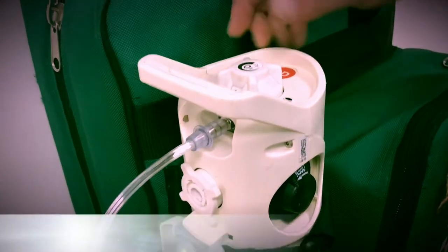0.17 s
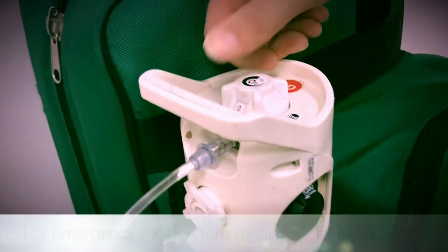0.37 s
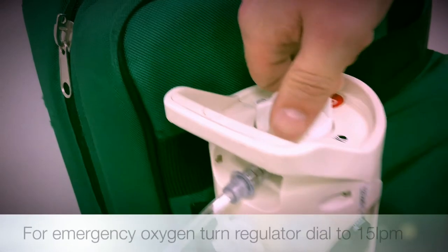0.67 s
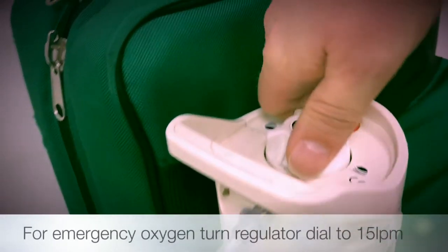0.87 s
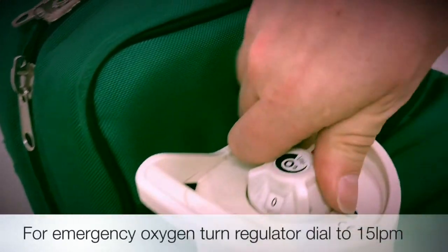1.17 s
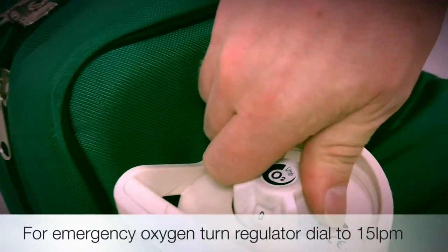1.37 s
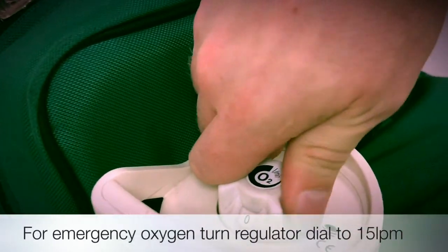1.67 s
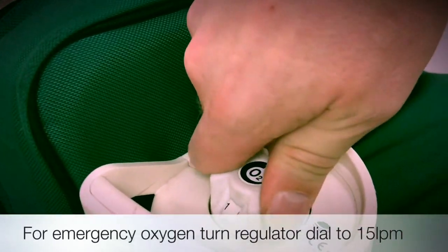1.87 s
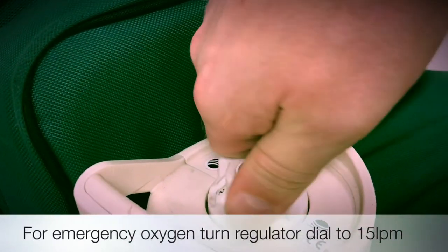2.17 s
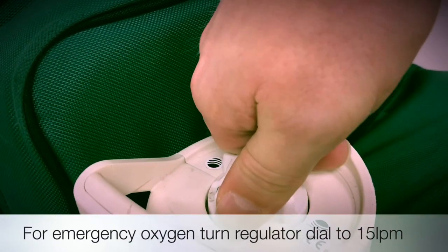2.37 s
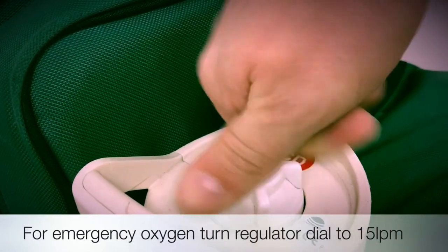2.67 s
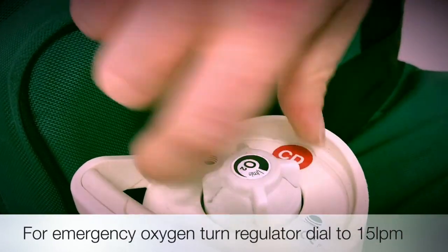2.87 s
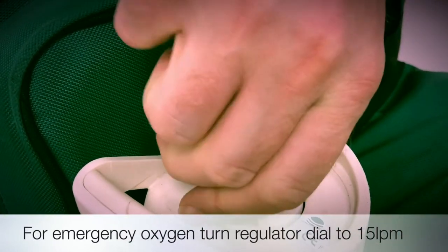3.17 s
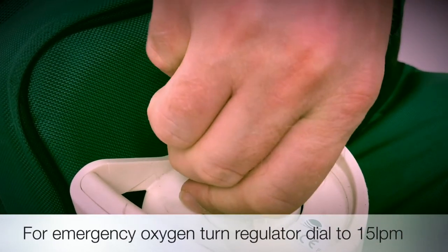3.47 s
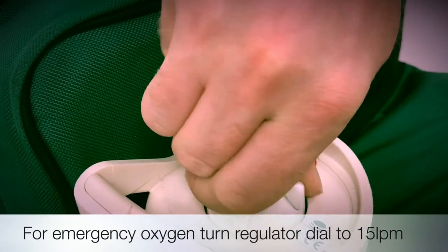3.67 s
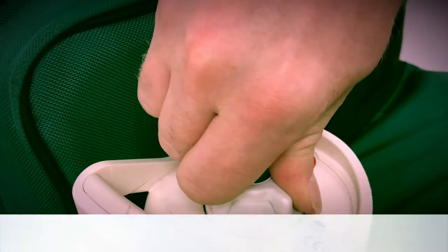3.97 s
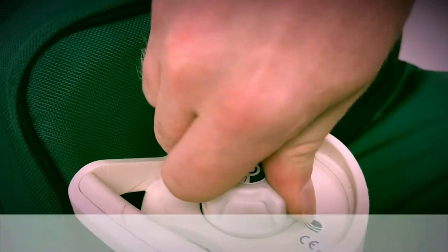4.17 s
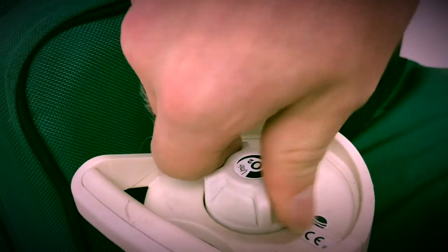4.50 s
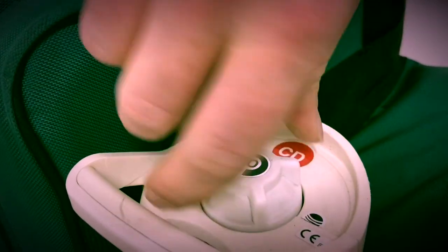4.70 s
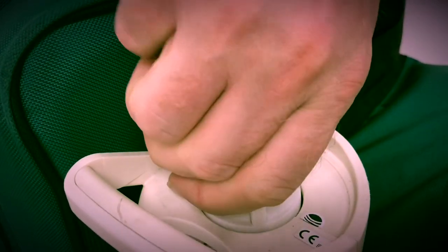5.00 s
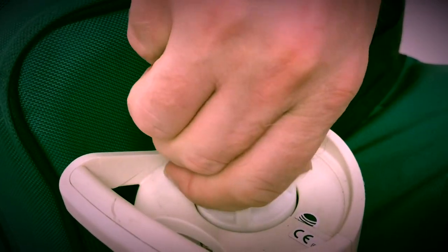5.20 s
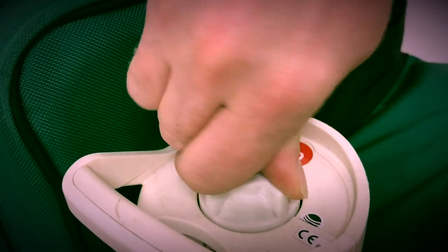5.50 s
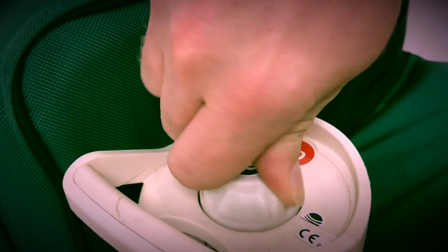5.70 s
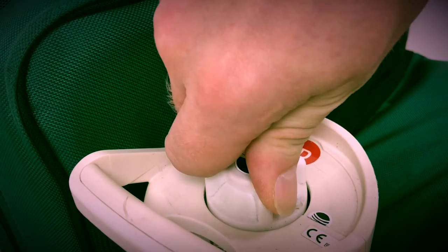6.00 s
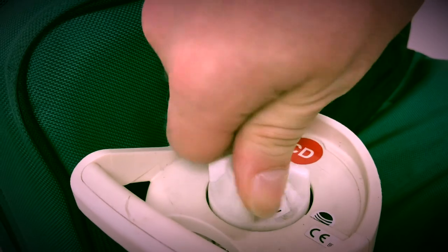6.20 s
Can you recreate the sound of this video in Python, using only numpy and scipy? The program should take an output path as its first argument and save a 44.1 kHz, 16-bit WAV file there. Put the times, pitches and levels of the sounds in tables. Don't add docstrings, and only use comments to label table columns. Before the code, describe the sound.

A hand turns a plastic gas-cylinder dial with sharp, rattling detent clicks over low ventilation rumble, while a hiss of gas grows stronger.

```python
import sys
import numpy as np
from scipy import signal
from scipy.fft import rfft, irfft, next_fast_len
from scipy.io import wavfile
from scipy.ndimage import uniform_filter1d

SR = 44100
rng = np.random.default_rng(int(sys.argv[2]) if len(sys.argv) > 2 else 0)


def makeup_ratio(level_db):
    decades = np.asarray(level_db, float) / 20
    return 10 ** decades


def waveform_to_disk(signal):
    frames = np.transpose(np.atleast_2d(signal))
    scaled = np.clip(frames, -1, 1) * 32767
    samples = np.round(scaled).astype(np.int16)
    wavfile.write(sys.argv[1], SR, samples)


N = 279946
T = np.arange(N) / SR
M = next_fast_len(N)
F = np.fft.rfftfreq(M, 1 / SR)


def level(x, db):
    return x * makeup_ratio(db) / np.sqrt(np.mean(x ** 2))


def add(out, s, x):
    i = int(s * SR)
    out[i:i + len(x)] += x[:N - i]


def colour(x, gain):
    return irfft(rfft(x, M) * gain, M)[..., :N]


def noise(gain):
    return level(colour(rng.standard_normal(N), gain), 0)


def shape(points):
    hz, db = np.transpose(points)
    return makeup_ratio(np.interp(np.log(F + 1), np.log(hz), db))


def peak(hz, width):
    return 1 / (1 + 1j * (F - hz) / (width / 2))


def band(x, lo_hz, hi_hz):
    edges_hz = [lo_hz, min(hi_hz, .45 * SR)]
    return signal.sosfilt(signal.butter(4, edges_hz, "band", fs=SR, output="sos"), x)


def walk(rate):
    k = int(SR / rate)
    once = uniform_filter1d(rng.standard_normal(N), k)
    return level(uniform_filter1d(once, k), 0)


def ring(impacts, hz, t60):
    r = makeup_ratio(-60 / (t60 * SR))
    poles = [1, -2 * r * np.cos(2 * np.pi * hz / SR), r * r]
    return level(signal.lfilter([1, 0, -1], poles, impacts), 0)


def flatten(x):
    spectrum = rfft(x)
    return irfft(spectrum / uniform_filter1d(np.abs(spectrum), size=80), len(x))


# (f/Hz, level/dB per Hz)
ROOM_AIR = [(20, -62), (42, -21), (58, -2), (70, -4), (88, 1), (105, -2.5), (130, -10), (190, -17),
            (215, -15.5), (300, -17), (380, -27), (600, -29.5), (1400, -34.5), (1800, -38),
            (1800, -38.5), (2550, -38.5), (3300, -43.5), (5000, -50), (8000, -55.5), (16000, -60)]
# (t/s, rumble level/dB)
RUMBLE_DRIFT = [(0, -44), (.6, -43), (1.0, -42.5), (1.6, -43), (2.1, -40.5), (2.6, -41), (3.05, -42.5),
                (3.3, -39), (3.65, -43), (4.2, -41), (4.7, -42), (5.2, -43), (5.75, -41), (6.0, -42),
                (6.35, -39.5)]


def room():
    air_db, hum_hz, hum_db = -41.5, 98.3, -50
    gust_db, gusts_per_s = 1.4, 6.9
    air = noise(shape(ROOM_AIR))
    low = colour(air, F < 135)
    hum = np.sqrt(2) * makeup_ratio(hum_db + 3.2 * walk(3.2)) * np.sin(2 * np.pi * hum_hz * T)
    rumble = low * makeup_ratio(air_db) + hum
    even = rumble / np.sqrt(uniform_filter1d(rumble ** 2, int(.14 * SR)))
    drift_db = np.interp(T, *np.transpose(RUMBLE_DRIFT))
    rumble = even * makeup_ratio(drift_db + gust_db * walk(gusts_per_s))
    return rumble + (air - low) * makeup_ratio(air_db + .5 * walk(1.1))


# (from t/s, jet level/dB, outlet tube level relative to jet/dB)
VALVE_STEPS = [(0, -65, -25), (1.0, -68.5, -25), (1.5, -70, -21), (1.98, -58.5, -16), (2.25, -59.5, -10),
               (2.6, -59, -11), (3.005, -70.5, -10), (3.7, -57.5, -13), (4.005, -58, -3), (4.31, -59, 1),
               (4.62, -63.5, 4.5), (4.8, -67, 9), (5.28, -60, 5), (5.52, -62, 9), (5.81, -56, 4.5),
               (6.0, -54.5, 2.5), (6.24, -47.5, -2)]
# (f/Hz, level/dB per Hz)
JET = [(500, -7), (1500, 5), (3000, 9.5), (6000, 6), (9500, 5), (13000, 2.5), (16000, 5.5)]
# (f/Hz, width/Hz, level/dB)
TUBE_MODES = [(1100, 430, -5.5), (1900, 1200, 0.5), (2770, 180, -33), (3400, 190, -4), (3830, 105, 1),
              (4460, 65, -4.5), (5930, 140, 0), (7350, 230, -37), (8550, 450, -12), (9800, 320, -21),
              (11300, 670, -7)]
# (f/Hz, width/Hz)
WHISTLE_BANDS = [(6950, 500), (12650, 220)]


def gas():
    valve_slew_s, whistles_from_s = 0.034, 2.6
    whistle_db = (-68, -70)
    per_tube_db, per_jet_db = (.5, .15), (.1, .9)
    s, *columns = np.transpose(VALVE_STEPS)
    step = np.maximum(np.searchsorted(s, T) - 1, 0)
    jet_db, share_db = (uniform_filter1d(c[step], int(valve_slew_s * SR)) for c in columns)
    tube_db = jet_db + share_db
    out = makeup_ratio(jet_db + 0.1 * walk(36)) * noise(shape(JET))
    tube = sum(makeup_ratio(db) * np.abs(peak(hz, width)) for hz, width, db in TUBE_MODES)
    out += makeup_ratio(tube_db + 1.0 * walk(3.3)) * noise(tube)
    for (hz, width), db, by_tube, by_jet in zip(WHISTLE_BANDS, whistle_db, per_tube_db, per_jet_db):
        db = db + by_tube * (tube_db + 55) + by_jet * (jet_db + 60)
        db = db - 12 * (T < whistles_from_s)
        out += makeup_ratio(db + 2.5 * walk(6)) * noise(peak(hz, width) ** 2)
    return out


# (start t/s, end t/s, f/Hz,
# width/Hz, rms level/dB)
REGULATOR_TONES = [(1.2, 2.0, 2500, 70, -72.5), (.3, 1.0, 2300, 2500, -67), (2.0, 3.7, 2490, 90, -74),
                   (.07, .17, 4100, 200, -68), (2.7, 3.7, 2765, 80, -74), (4.45, 5.55, 2770, 45, -68),
                   (4.75, 5.3, 8100, 250, -75), (4.6, 5.3, 6050, 200, -74), (4.6, 5.3, 9800, 300, -77),
                   (.56, .72, 7350, 200, -72), (2.8, 4.3, 1320, 90, -73), (.1, 1.5, 1220, 90, -73),
                   (4.0, 4.35, 6950, 500, -63), (2.9, 3.7, 12650, 200, -78), (4.4, 4.8, 12650, 250, -73),
                   (3.0, 3.7, 7200, 300, -80), (.5, .62, 10000, 400, -72), (.76, .87, 4350, 250, -66),
                   (5.55, 6.6, 6300, 4000, -62)]


def tones():
    out, fade_s = 0, 0.066
    for start, end, hz, width, db in REGULATOR_TONES:
        gate = np.clip(np.minimum(T - start, end - T) / fade_s, 0, 1)
        out = out + gate * makeup_ratio(db + 1.5 * walk(8)) * noise(peak(hz, width) ** 2)
    return out


# (t/s, peak level/dB, f/Hz)
SKIN_TICKS = [(.724, -43, 5660), (.776, -52, 6000), (.782, -39, 3550), (.864, -44, 9000), (.879, -46, 6000),
              (.888, -50, 10000), (.909, -41, 7000), (.937, -48, 13000), (.943, -42, 9000),
              (.975, -42, 11000), (1.021, -47, 10000), (1.032, -47, 10000), (1.074, -43, 13000),
              (1.124, -48, 12000), (1.213, -45, 8000), (1.228, -43, 7000), (1.273, -54, 10000),
              (1.570, -39.5, 9000), (1.605, -45, 9000), (1.709, -35.5, 6000), (1.711, -43, 3530),
              (1.784, -54, 3500), (1.868, -48, 6500), (3.173, -48, 2800), (3.253, -41, 2500),
              (.259, -47, 6300), (1.176, -48, 6000), (2.028, -40, 9000), (2.23, -47, 10000),
              (3.738, -32, 5000)]
# (peak t/s, rms level/dB, rise/s, fall/s, centre f/Hz)
FINGER_RUBS = [(.11, -60, .02, .03, 3500), (.25, -67, .03, .03, 12000), (.55, -61, 0.012, .025, 9500),
               (.808, -55, .006, .006, 5500), (.823, -54, 0.0074, .008, 4870),
               (.895, -57.5, .012, 0.025, 7000), (.955, -58.5, 0.013, 0.016, 11000),
               (1.156, -43.5, 0.0078, 0.017, 7540), (1.16, -46.5, 0.015, 0.0087, 3850),
               (1.71, -53, 0.0055, 0.014, 2980), (1.32, -54, 0.028, 0.02, 8000),
               (1.6, -59.5, 0.032, 0.039, 9000), (1.75, -62, 0.044, 0.029, 8000),
               (2.703, -49, 0.02, 0.015, 13100), (3.148, -57, .01, 0.017, 4010),
               (4.575, -58, .025, .03, 9000)]
# (f/Hz, width/Hz, level/dB)
DIAL_MODES = [(2430, 890, 2), (4120, 450, 2), (6000, 490, -3), (6840, 660, -3), (9900, 1600, -9.5),
              (11900, 810, -2), (13200, 460, -22), (15000, 570, -15)]


def fingers():
    out, t = np.zeros(N), T[:int(.02 * SR)]
    for s, db, hz in SKIN_TICKS:
        burst = rng.standard_normal(len(t)) * makeup_ratio(-60 * t / .003)
        tick = band(burst, hz / 2.2, hz * 2.0)
        add(out, s, makeup_ratio(db) * tick / np.abs(tick).max())
    grain = rng.standard_normal(N) * makeup_ratio(1.85 * rng.exponential(size=N))
    dial = 0.5 + sum(makeup_ratio(db) * np.abs(peak(hz, width)) ** 2 for hz, width, db in DIAL_MODES)
    grain = colour(grain, dial)
    for s, db, rise, fall, hz in FINGER_RUBS:
        near = slice(max(int((s - .1) * SR), 0), int((s + .1) * SR))
        swell = np.exp(-np.abs((T[near] - s) / np.where(T[near] < s, rise, fall)))
        out[near] += swell * level(band(grain[near], hz / 2.77, hz * 1.75), db)
    return out


def pin_rattle(t, ms):
    u = t / (ms / 1000)
    rattle = np.minimum(u / .2, 1) * np.exp(-np.maximum(u - .85, 0) / .15)
    impacts = rattle * rng.standard_normal(len(t)) * makeup_ratio(2.0 * rng.exponential(size=len(t)))
    return flatten(impacts) * np.minimum(3 * rattle, 1)


# (f/Hz, level/dB, t60/s)
HOUSING_MODES = [
    [(2050, -6, .015), (2320, 0, .035), (2660, -3, .025)],
    [(3050, -5, .015), (3420, 0, .02), (3800, -5, .03), (4400, -6, .02)],
    [(4950, -8, .015), (5550, -1, .02), (5850, -2, .03), (6200, -3, .012), (6650, 0, .018), (7000, -4, .02)],
    [(8000, 0, .012), (8500, -3, .018), (8900, 0, .012), (9700, -2, .01), (10900, -2, .012)],
    [(11600, -2, .008), (12500, -3, .008), (13600, -1, .01), (14300, -1, .012), (15200, 0, .012)],
]
# (low f/Hz, high f/Hz)
GROUP_BANDS = [(1950, 2900), (2900, 4700), (4700, 7500), (7500, 11300), (11300, 16500)]


def housing_group(impacts, t, modes, lo, hi):
    tail_db = -9
    chance = rng.standard_normal((len(modes), 2))
    body = 0
    for (hz, db, t60), (a, b) in zip(modes, chance):
        body = body + makeup_ratio(db + 2.2 * a) * ring(impacts, hz * (1 + .008 * b), t60)
    hit = level(band(body, .9 * lo, 1.1 * hi), 0) + level(band(impacts, lo, hi), -7)
    grain = rng.standard_normal(len(t)) * makeup_ratio(2.3 * rng.exponential(size=len(t)))
    decay = makeup_ratio(-60 * t / (0.13 * (4000 / lo) ** 0.58))
    tail = band(grain, lo, hi) * decay * np.minimum(t / 0.003, 1)
    return level(hit, 0) + level(tail, tail_db)


# (t/s, level/dB,
# brightness/dB per mode group, rattle/ms, freest mode f/Hz)
HOUSING_STRIKES = [(1.9726, -6.5, 2, 0.95, 9460), (1.9765, 1, 0.5, 3.1, 8870), (2.2452, -4, 1, 1.8, 9700),
                   (2.2486, 1.5, 0, 2.7, 8800), (2.5961, -6, 2.5, 2.1, 11670), (2.599, -2.5, 2.5, 1.3, 8800),
                   (3.1902, -10, -2, 1.15, 5520), (3.2762, -16, -3.5, 4.8, 2400), (3.6987, -1.5, 1, 3.4, 2343),
                   (4.0034, 0, 0.5, 3.6, 6500), (4.3073, -0.5, 0, 3.66, 7980), (5.2752, 3, -0.5, 3.1, 3660),
                   (5.518, -0.5, -1, 2.3, 6230), (5.8019, 2, 0.5, 2.7, 6250), (6.2332, 0, 2, 2.9, 8750)]
# (from t/s, f/Hz, f/Hz, spring ring level/dB, middle group level/dB)
HAND_GRIPS = [(0, 7830, 10920, -10, -4), (2.1, 5810, 7780, -10.5, -6), (2.5, 6630, 9140, -18, -0.5),
              (3.0, 2310, 4100, -24.5, -3), (3.23, 6150, 4180, -22, -1.5), (3.5, 3400, 15150, -5, -3),
              (3.9, 3380, 5840, -8, -1), (5.0, 6930, 8060, -5, -3.5), (5.4, 3360, 5700, -2, 4.5),
              (5.7, 5900, 15000, -6, 3.5), (6.0, 3380, 5850, -5, -1)]
GROUP_SHARE = (-31, -30, -26, -23, -24.5)


def detents():
    spring_hz, spring_t60_s, spring_ring_db = (3470, 3590), .095, -30
    free_t60_s, free_dbs = .015, (-29.5, -32.5, -32.5)
    bounce_s, bounce_db = .0058, -14
    out, t = np.zeros(N), T[:int(.12 * SR)]
    for s, strike_db, bright_db, ms, freest_hz in HOUSING_STRIKES:
        _, *free_hz, spring_db, middle_db = [g for g in HAND_GRIPS if g[0] < s][-1]
        place = np.arange(5) - 2
        group_db = strike_db + np.array(GROUP_SHARE) + bright_db * place + middle_db * (place == 0)
        impacts = pin_rattle(t, ms)
        spring = ring(impacts, spring_hz[0], spring_t60_s)
        spring = spring + 0.65 * ring(impacts, spring_hz[1], 0.87 * spring_t60_s)
        click = level(spring, strike_db + spring_ring_db + spring_db)
        for hz, db in zip([freest_hz, *free_hz], free_dbs):
            click += makeup_ratio(strike_db + db) * ring(impacts, hz, free_t60_s * (6000 / hz) ** 0.7)
        for modes, (lo, hi), db in zip(HOUSING_MODES, GROUP_BANDS, group_db):
            click += level(housing_group(impacts, t, modes, lo, hi), db - 3.0)
        click = band(click, 1400, 18000) * np.sqrt(.004 / .12)
        click += band(level(impacts, strike_db - 52.5), 454, 1700)
        add(out, s, click)
        add(out, s + bounce_s, makeup_ratio(bounce_db) * band(click, 1800, 6200))
    return out


# (t/s, peak level/dB, f/Hz, t60/s)
SHELL_KNOCKS = [(1.977, -39.5, 1100, 0.072), (2.251, -35.5, 910, 0.061), (2.600, -37.5, 956, 0.11),
                (3.149, -50, 1130, 0.055), (3.191, -36, 1500, 0.046), (3.281, -40, 624, 0.08),
                (3.279, -38, 1410, 0.036), (3.700, -33, 960, 0.13), (4.005, -47, 1010, .02),
                (4.31, -44, 975, 0.017), (4.323, -32, 860, 0.078), (4.561, -40.5, 2070, 0.057),
                (5.277, -40, 888, 0.16), (5.520, -40.5, 1010, 0.061), (5.803, -30.5, 1390, 0.056),
                (6.235, -32.5, 1060, 0.037)]


def knocks():
    shell_ring_db = -6
    out, t = np.zeros(N), T[:int(.1 * SR)]
    for s, db, hz, t60 in SHELL_KNOCKS:
        burst = rng.standard_normal(len(t)) * makeup_ratio(-60 * t / t60)
        thud = level(band(burst, hz / 1.7, hz * 1.9), 0)
        knock = thud + makeup_ratio(shell_ring_db) * ring(burst * makeup_ratio(-60 * t / .01), hz, t60)
        add(out, s, makeup_ratio(db) * knock / np.abs(knock).max())
    return out


def scene():
    return (room() + gas() + tones() + fingers() + detents() + knocks())[None]


def top_cut(x):
    return signal.sosfilt(signal.butter(12, 17020, fs=SR, output="sos"), x)


# (t/s, fall/s, rise/s, depth level/dB)
LEVEL_DIPS = [
    (0.063, 0.036, 0.026, -22),
    (4.431, 0.033, 0.034, -15.5),
]


def record(dry):
    x = colour(dry, 1 - 0.39 * np.abs(peak(10800, 1160)) ** 2)
    top_hz = 15780
    x = signal.sosfilt(signal.ellip(8, .3, 45, top_hz, fs=SR, output="sos"), x)
    for s, fall, rise, db in LEVEL_DIPS:
        distance = np.abs(T - s) / np.where(T < s, fall, rise)
        x = x * np.clip(distance, makeup_ratio(db), 1) ** 1.17
    x = x * np.where(T < LEVEL_DIPS[0][0], makeup_ratio(-2.5), 1)
    return top_cut(x)


dry = scene()
out = record(dry)
waveform_to_disk(out)
```